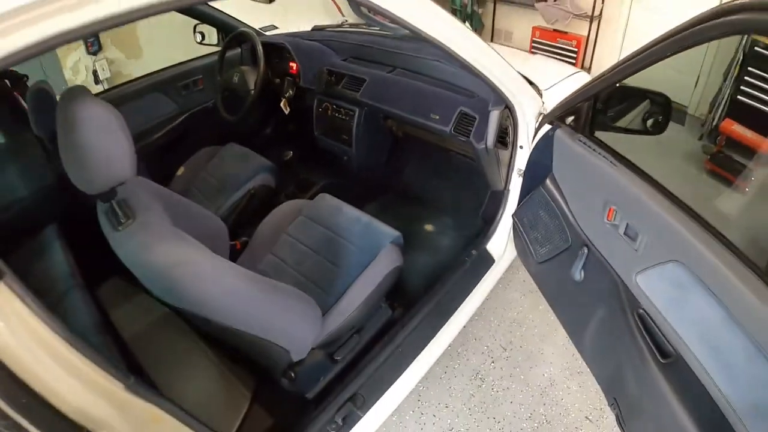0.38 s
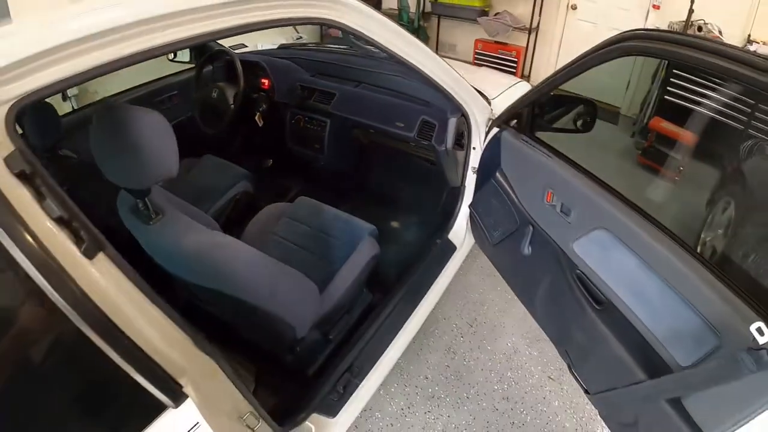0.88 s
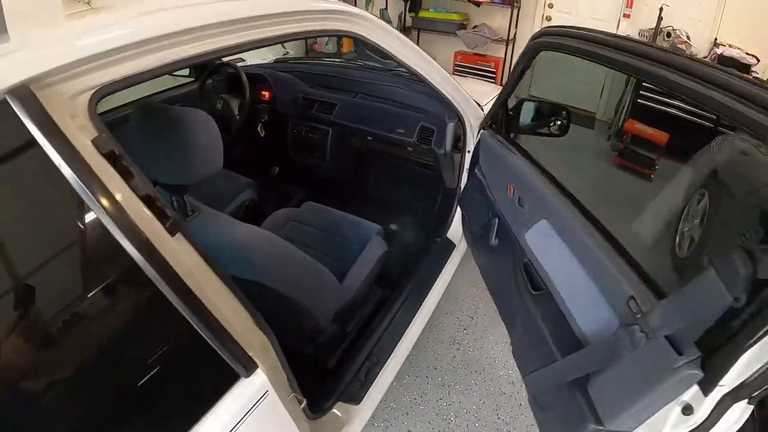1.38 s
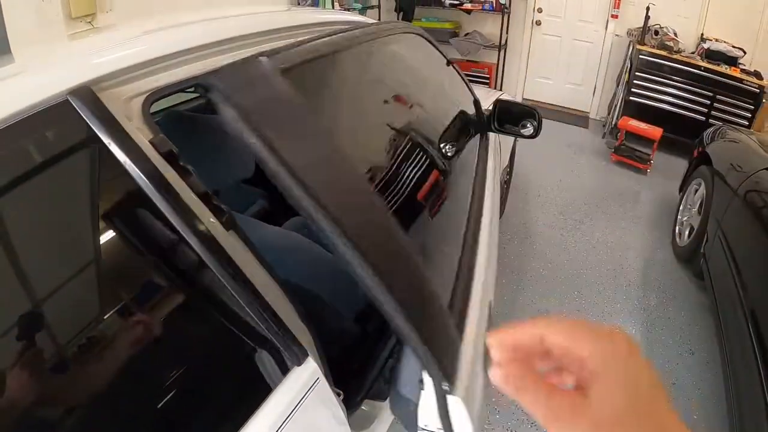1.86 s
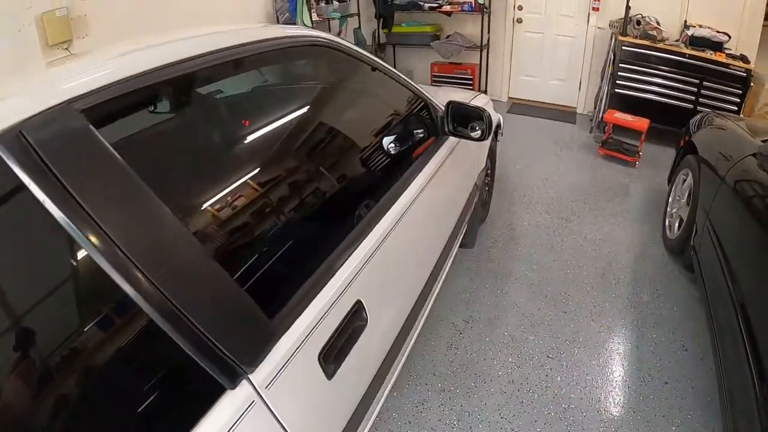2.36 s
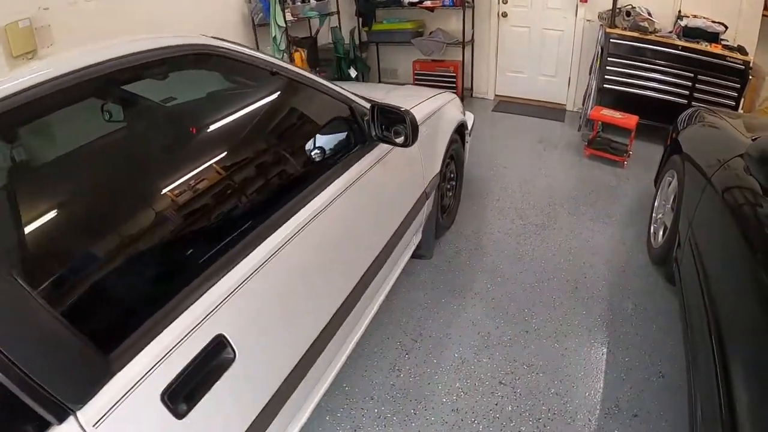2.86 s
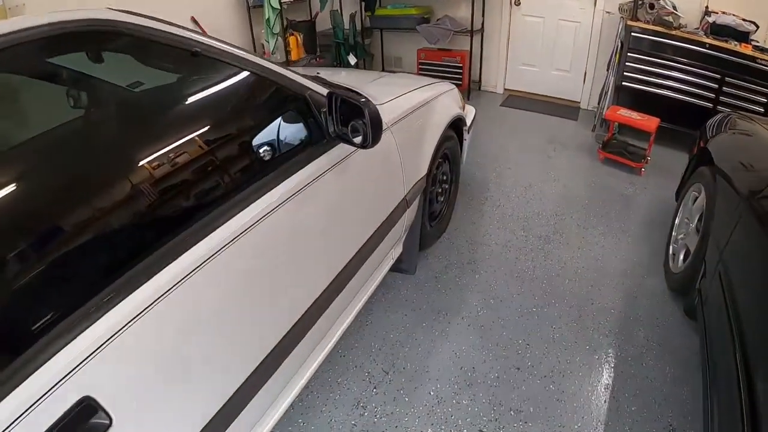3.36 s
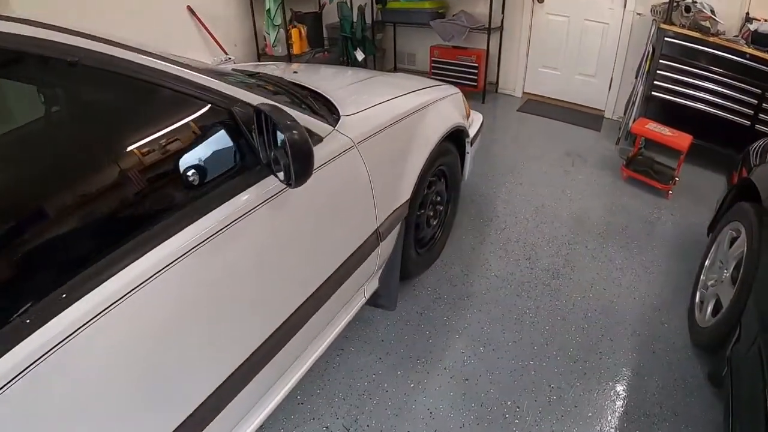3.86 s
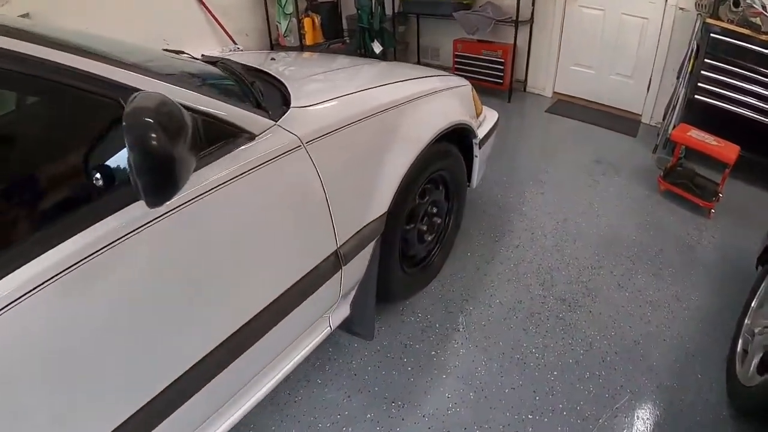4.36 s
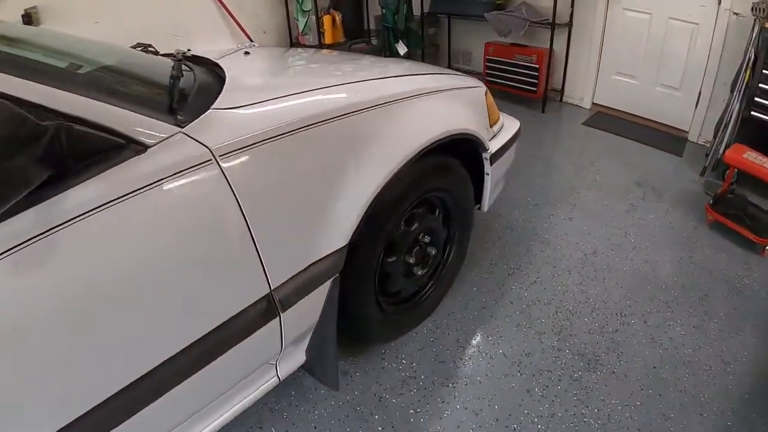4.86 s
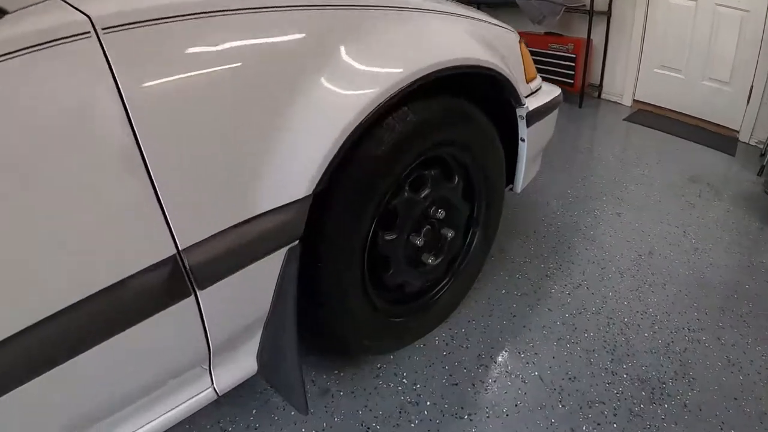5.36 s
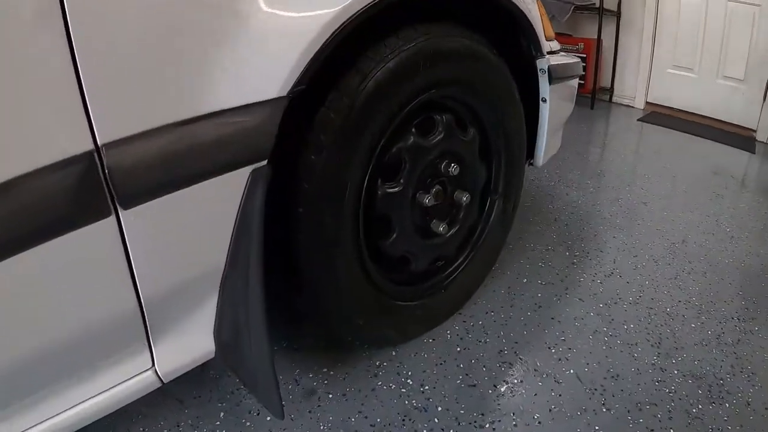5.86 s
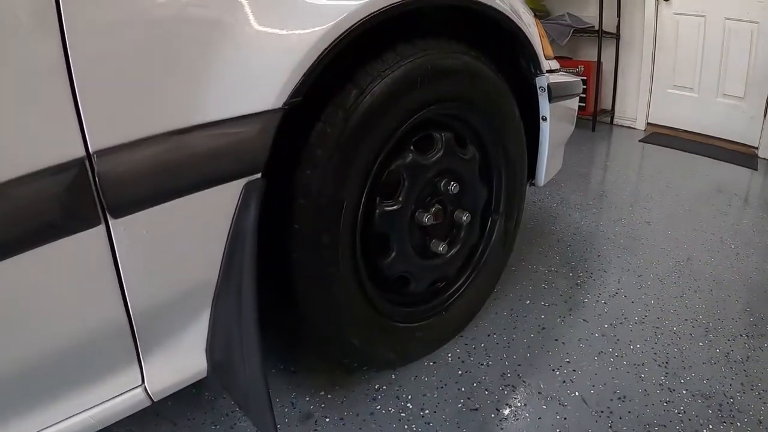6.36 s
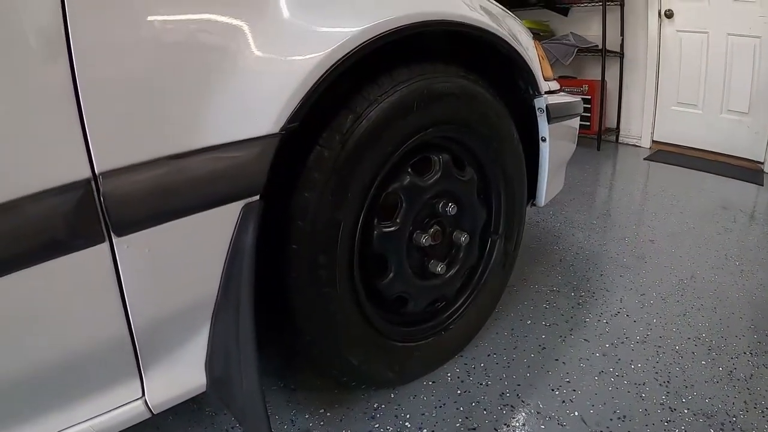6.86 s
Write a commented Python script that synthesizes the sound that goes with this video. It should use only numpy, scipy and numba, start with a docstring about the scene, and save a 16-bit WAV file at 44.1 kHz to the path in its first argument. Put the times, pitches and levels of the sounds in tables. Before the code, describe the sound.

Close handheld stereo sound beside an idling car indoors: deep wavering drone, fast dull pulses, breathy fan and belt hiss with faint whines. A very short rubbery squeak, later a cluster of metal clicks, then a heavy door slam with clattering glass and trim and a quick garage echo. Afterwards only the engine remains, momentarily subdued, becoming fuller and more throbbing as the listener walks to the front.

```python
"""Idling car in a closed garage, and a slammed door

A car idles: low crank-order tones and a dull knock under coloured hiss and thin whines, all shifting as the
listener comes nearer the engine bay. A sole squeaks by stick-slip, the door's check strap snaps, then after
a soft puff of air the slam drives the door's modes and shakes loose a dense rattle, in a decaying noise tail
of garage echo. Gain control ducks everything after the slam and creeps back."""
import sys
import numpy as np
from scipy import signal
from scipy.fft import rfft, irfft
from scipy.io import wavfile
from scipy.ndimage import uniform_filter1d
from numba import njit

SR = 44100
rng = np.random.default_rng(int(sys.argv[2]) if len(sys.argv) > 2 else 0)


def inscribe(sig):
    """Save sig as 16-bit PCM at rate SR to the path in sys.argv[1].

    A 1-D sig is mono; a 2-D sig holds one channel per row.
    Samples are clipped to [-1, 1] before scaling.
    """
    pcm = np.round(np.clip(np.atleast_2d(sig).T, -1, 1) * 32767)
    wavfile.write(sys.argv[1], SR, pcm.astype(np.int16))


def makeup_ratio(level_db):
    """Linear amplitude ratio for a level in decibels (20 dB per factor of ten)."""
    decades = np.asarray(level_db, float) / 20
    return 10 ** decades


N = 318843
T = np.arange(N) / SR
F = np.fft.rfftfreq(N, 1 / SR)
BANDS = 25 * 2 ** np.arange(0, 9.6, .5)  # half-octave centres, Hz

CRANK_HZ = 15.55
THROB_DB_PER_M = 11  # fall of the upper orders and of the knock
# stereo width of hiss and echo: (f/Hz, side minus mid/dB)
SIDE_COLOUR = [(60, -28), (200, -20), (380, -14), (700, -13), (1290, -10.5), (2380, -7), (4400, -6),
               (8120, -1.5), (15000, 3)]


def along(table, hz):
    """Read (f/Hz, value) points on a log-frequency axis."""
    f, v = np.transpose(table)
    return np.interp(np.log(hz + 1), np.log(f + 1), v)


def unit(x):
    """Scale to rms 1."""
    return x / np.sqrt(np.mean(x ** 2))


def walk(rate):
    """Smooth random drift of rms 1, with rate new values a second."""
    k = int(SR / rate)
    held = np.repeat(rng.standard_normal(N // k + 1), k)
    smooth = uniform_filter1d(uniform_filter1d(held, k), k)
    return unit(smooth[:N])


def slices(hz):
    """Overlapping half-octave windows that add up to one."""
    place = np.clip(2 * np.log2(np.maximum(hz, 1) / BANDS[0]), 0, len(BANDS) - 1)
    return [np.cos(np.pi / 2 * np.clip(place - k, -1, 1)) ** 2 for k in range(len(BANDS))]


def ring(x, hz, t60):
    """One decaying mode driven by x; t60 is at least 5 ms."""
    pole = np.exp(2j * np.pi * hz / SR - np.log(1000) / (max(t60, .005) * SR))
    return signal.lfilter([1], [1, -pole], x).imag


def crack(hz, decay_ms, low=0.7, high=1.136):
    """A few milliseconds of noise in a band from low to high times hz, peak 1."""
    t = np.arange(SR // 20) / SR
    burst = rng.standard_normal(len(t)) * np.exp(-t * 1000 / decay_ms)
    band = signal.butter(2, [low * hz, min(high * hz, SR / 2.2)], "band", fs=SR, output="sos")
    burst = signal.sosfilt(band, burst)
    return burst / np.abs(burst).max()


def add(out, s, x):
    """Mix x into out from time s."""
    k = int(s * SR)
    out[k:k + len(x)] += x


def stereo(mid, side):
    """Mid and side to left and right."""
    return np.array([mid + side, mid - side])


def distance():
    """Metres from the listener to the engine bay."""
    # the walk: nearer the engine bay, slowly until the slam, then faster, with one short step back:
    # (t/s, distance/m)
    steps = [(0, 2.77), (.3, 2.5), (1.0, 2.48), (1.7, 2.43), (2.5, 2.36), (3.3, 1.78), (4.2, 1.88),
             (5.0, 1.51), (5.6, 1.32), (6.3, 0.98), (7.23, 1)]
    return np.interp(T, *np.transpose(steps))


def hiss_db():
    """Level of the engine's hiss along the walk: -32.5 dB at 1 m, falling 3.5 dB per m."""
    return -32.5 - 3.5 * (distance() - 1)


def hum(turns):
    """Crank orders as wavering tones; low ones pass through nodes along the walk, upper ones fade with distance."""
    # pitch of each order: (multiple of the crank speed)
    orders = [2, 4, 6, 8, 8.7, 16, 24, 27, 29, 36]
    # level of each order at 1 m, ahead of its standing wave: (level/dB)
    order_db = [-32.5, -27, -42, -48.5, -46.5, -49.5, -52, -48.5, -50.5, -48]
    # the five lowest orders stand between the walls:
    # (distance of a node/m, level left at the node/dB, fall/dB per m)
    standing = [(5.14, -22, -0.15), (2.67, -17, 6.5), (1.47, -16, 0.7), (1.39, -5.5, -5),
                (1.255, -19.5, -7)]
    # the open cabin booms once per firing, against the room's phase, until the door shuts: (t/s, level/dB)
    cabin = [(0, -28), (.25, -25.5), (.62, -22), (1.2, -28.5), (1.7, -32.5), (2.19, -32)]
    r, out = distance(), 0
    for k, (order, db) in enumerate(zip(orders, order_db)):
        if k < len(standing):
            node_m, node_db, db_per_m = standing[k]
            wave = np.sin(2 * np.pi * (node_m - r) * order * CRANK_HZ / 343)
            reach = wave + 1j * makeup_ratio(node_db)  # the node never falls quite silent
        else:
            reach, db_per_m = 1, THROB_DB_PER_M
        size = reach * makeup_ratio(db - db_per_m * (r - 1))
        if k == 0:
            size = size - makeup_ratio(np.interp(T, *np.transpose(cabin))) * (T < cabin[-1][0])
        # higher orders reach the ear by many paths and waver more
        waver = min(order / 16, 1)
        drift = waver * (0.37 * walk(2.945) + .5 * walk(14))
        phase = 2 * np.pi * (order * turns + rng.random()) + drift
        swell = makeup_ratio((1.3 + 1.22 * waver) * walk(4))
        out = out + np.sqrt(2) * swell * (size * np.exp(1j * phase)).imag
    return stereo(out, 0)


def knock(turns):
    """The block takes a dull knock once per crank turn, never quite the same, and rings briefly."""
    level_db, hz, t60_s = -36.5, 288, 0.12  # rms level at 1 m
    scatter_db, scatter_s = 2.5, 0.00067  # standard deviations of strength and timing
    at = np.flatnonzero(np.diff(np.floor(turns)))
    chance = rng.standard_normal((len(at), 2))
    late = (scatter_s * SR * chance[:, 0]).astype(int)
    push = np.zeros(N)
    push[np.clip(at + late, 0, N - 1)] = makeup_ratio(scatter_db * chance[:, 1])
    # two modes in a row soften the onset
    rung = unit(ring(ring(push, hz, t60_s), hz, t60_s / 2))
    return rung * makeup_ratio(level_db - THROB_DB_PER_M * (distance() - 1))


def rush(turns):
    """Fan, belts and valves: coloured noise in bands that flicker alone, pulsing a little with each crank turn."""
    # broad colour of the hiss, relative: (f/Hz, level/dB per Hz)
    colour = [(12, -38), (20, -5.5), (50, -7.5), (133, -19), (190, -18), (297, -16.5), (351, -19),
              (564, -16.5), (856, -21), (1370, -17), (4300, -27), (5670, -38.5), (9110, -48), (13100, -65),
              (15400, -74)]
    # resonances of engine bay and belts: (f/Hz, width/Hz, level over the rush/dB)
    bay = [(758, 61, -5), (1005.5, 9, 7.5), (1200, 12, 5.5), (1353, 28, 7.5), (1493, 66, 4.5),
           (1720, 140, 2), (2237, 4.7, 13.5), (2428, 7.8, 13.5), (3068, 63, 6.5), (9370, 44, 10)]
    body_db_per_m, treble_db_per_m = 2, -0.8  # tilt with distance below 600 Hz and above 7 kHz
    beyond = distance() - distance().mean()
    colour_db = along(colour, F) + sum(db / (1 + (2 * (F - hz) / w) ** 2) for hz, w, db in bay)
    mid, side = rfft(rng.standard_normal((2, N))) * makeup_ratio(colour_db)
    side = side * makeup_ratio(along(SIDE_COLOUR, F))
    # the hiss level refers to the mid between 1 and 5 kHz
    scale = np.sqrt(np.mean(irfft(mid * ((F > 1000) & (F < 5000)), N) ** 2))
    pulse = np.cos(2 * np.pi * turns)
    edges = np.log([600, 1000, 5000, 7000])
    out = 0
    for hz, window in zip(BANDS, slices(F)):
        tilt = np.interp(np.log(hz), edges, [body_db_per_m, 0, 0, treble_db_per_m])
        flicker_db = 0.51 * walk(1.85) + 0.66 * walk(9)
        db = hiss_db() + tilt * beyond + flicker_db + 0.14 * pulse
        out = out + makeup_ratio(db) * stereo(*irfft(np.array([mid, side]) * window, N))
    return out / scale


def whines():
    """Narrow tones of gears, belt and alternator, whose level and stereo phase drift at random."""
    # the thin tones: (f/Hz, peak over the hiss level/dB)
    tones = [(1028, -20.5), (1373, -13), (1495, -11.5), (1690, -25), (2239, -20), (2433, -19), (3020, -19),
             (9442, -40)]
    out = 0
    for hz, db in tones:
        phase = 2 * np.pi * hz * T + 2.8 * walk(25)
        swell = makeup_ratio(db + 2.4 * walk(2.96))
        out = out + swell * np.array([np.sin(phase), np.sin(phase + 0.73 * walk(2.86))])
    return out * makeup_ratio(hiss_db())


def squeak():
    """Stick-slip of rubber: each slip is a buzzy climbing tone whose partials swell as they cross a resonance."""
    # a sole squeaks on the coated floor in two slips:
    # (t/s, length/s, slip rate/Hz, climb/Hz per s, level/dB)
    slips = [(0.355, .017, 950, 2200, -25), (.367, 0.0355, 761, 4240, -29)]
    # rubber resonances: (f/Hz, width/Hz, level/dB)
    sole = [(940, 270, -2.5), (1640, 220, 1.5), (3080, 300, -3.5), (4920, 180, -23)]
    attack_s, release_s = 0.0032, 0.0046
    out = 0
    for s, length, start_hz, climb, db in slips:
        hz = start_hz + climb * np.clip(T - s, 0, length)
        phase = 2 * np.pi * np.cumsum(hz * (1 + 0.016 * walk(300))) / SR
        shape = np.clip(np.minimum((T - s) / attack_s, (s + length - T) / release_s), 0, 1)
        for k in range(1, 7):
            gain = sum(makeup_ratio(peak_db) / (1 + (2 * (k * hz - f) / w) ** 2) for f, w, peak_db in sole)
            out = out + np.sqrt(2) * makeup_ratio(db) * shape * gain * np.sin(k * phase)
    return out


def snaps():
    """Short metallic ticks: an impulse rings one mode under a bright noise edge."""
    # the door check strap snaps as the door starts to swing:
    # (t/s, ring level/dB, ring f/Hz, ring t60/s, crack level/dB)
    ticks = [(1.543, -17, 1510, .014, -25.5), (1.549, -20, 1520, 0.026, -29),
             (1.555, -29, 1365, 0.074, -48)]
    out = np.zeros(N)
    for s, db, hz, t60, crack_db in ticks:
        impulse = np.r_[1., np.zeros(SR // 4)]
        add(out, s, makeup_ratio(db) * ring(impulse, hz, t60))
        add(out, s, makeup_ratio(crack_db) * crack(2800, 2.6, low=.06, high=2.0))
    return out


def slam():
    """Each blow pushes the door's modes and springs back, softer ones for longer, and throws a crack."""
    # a soft puff of air, then contacts as the door meets latch, seals and frame:
    # (t/s, relative blow level/dB, push length/ms, crack peak level/dB, crack f/Hz)
    blows = [(2.165, -24, 14.5, -60, 600), (2.1916, -16, 0.68, -7.5, 2700), (2.1944, -8, 1.86, -26, 3000),
             (2.1991, -2.5, 3.7, -19, 900), (2.211, 1, 21.1, -33, 4500), (2.2114, -8.5, 2.75, -9, 2580),
             (2.214, -2.5, 6.2, -9, 1200), (2.221, -21, 3.05, -34, 6000), (2.236, 2, 21, -26, 1200),
             (2.2435, -4, 0.67, -14.5, 6360), (2.251, -25, 8.1, -21, 1000), (2.263, -1, 7.7, -22, 1400),
             (2.2756, -12, 2, -18, 5100), (2.296, -15.5, 2, -28, 1300), (2.309, 3.5, 26.4, -19, 2700),
             (2.311, -5.5, 4.47, -34, 900), (2.33, -5.5, 8.1, -51, 900), (2.346, -16, 12, -51, 905)]
    # modes of door and cabin: (f/Hz, relative level/dB, t60/s)
    door = [(30, -7, 0.23), (52.4, 0, 0.35), (80.4, 0, 0.2), (119, -1, 0.22), (169, 0.5, 0.2),
            (134.4, 2, 0.14), (212.7, 4, 0.15), (250, 2, 0.069), (281, 1, 0.11), (390, 0, 0.06),
            (435, 2, 0.087), (580, -3, 0.033), (626, 3, 0.13), (724, 6, 0.05), (830, -9, 0.19),
            (976, -3, 0.06), (1200, 6, 0.1), (1620, -7, 0.072), (1890, -1, 0.057), (2083, -11, 0.039),
            (2370, 2, 0.038), (2756, -33, .05), (3000, -28, .04), (5100, -32, .05), (6158, -22, .04)]
    push, cracks = np.zeros(N), np.zeros(N)
    for s, db, ms, crack_db, hz in blows:
        count = int(ms * SR / 1000) + 2
        swing = np.sin(2 * np.pi * np.arange(count) / count)
        add(push, s, makeup_ratio(db) * swing * np.hanning(count) / count)
        add(cracks, s, makeup_ratio(crack_db) * crack(hz, 3.5))
    return cracks + 0.89 * sum(makeup_ratio(db) * ring(push, hz, t60) for hz, db, t60 in door)


def rattle():
    """Glass, trim and lock rods shake loose at the latch: dense unequal knocks that die away ever faster."""
    # colour given by the panels, relative: (f/Hz, level/dB per Hz)
    colour = [(120, -30), (250, 4), (700, -2.5), (1300, -4.5), (2600, -14), (4000, -24.5), (6200, -34),
              (9000, -39.5), (15000, -54)]
    start_s, level_db = 2.192, -18
    hold_s, fade_s = .07, .23  # fade: time to lose 60 dB after the hold
    treble_db, treble_rise_s = 3.5, 0.039
    knocks = rng.standard_normal(N) * makeup_ratio(2.5 * walk(300))
    shaped = rfft(knocks) * makeup_ratio(along(colour, F))
    low, high = irfft(shaped * np.array([F < 4000, F >= 4000]), N)
    since = np.maximum(T - start_s, 0)
    fade_db = 60 * (np.maximum(since - hold_s, 0) / fade_s) ** 2
    gate = makeup_ratio(level_db - fade_db) * (since > 0)
    # the small bright parts start at a third and join fully a moment later
    bright = makeup_ratio(treble_db) * np.minimum(0.33 + since / treble_rise_s, 1)
    # the level refers to the part below 4 kHz
    return gate * (low + bright * high) / np.sqrt(np.mean(low ** 2))


def garage(x, wet_db):
    """Hard walls: a noise tail with its own decay in each band, short in the high treble, wider with pitch."""
    # decay of the room: (f/Hz, t60/s)
    decay = [(30, 0.99), (200, 0.38), (1000, 0.32), (4000, 0.34), (12000, 0.17)]
    # thin walls let the bass out: (f/Hz, level/dB)
    bass = [(30, -11), (120, -1), (300, -1.5), (15000, -3)]
    t = T[:SR]
    hz = np.fft.rfftfreq(SR, 1 / SR)
    mid, side = rfft(rng.standard_normal((2, SR)))
    both = np.array([mid, side * makeup_ratio(along(SIDE_COLOUR, hz))]) * makeup_ratio(along(bass, hz))
    tail = 0
    for f, window in zip(BANDS, slices(hz)):
        tail = tail + irfft(both * window, SR) * np.exp(-np.log(1000) * t / along(decay, f))
    energy = np.sum(tail[0] ** 2)
    # echoes build up over 20 ms
    tail = tail * np.clip(t / 0.02, 0, 1) / np.sqrt(energy)
    wet = signal.fftconvolve(x[None], makeup_ratio(wet_db) * tail, axes=1)[:, :N]
    return stereo(x + wet[0], wet[1])


def scene():
    """Idling engine with a slightly unsteady crank, and the close events in the room."""
    turns = np.cumsum(CRANK_HZ * (1 + 0.00384 * walk(1.5))) / SR
    engine = hum(turns) + knock(turns) + rush(turns) + whines()
    small = garage(squeak() + snaps(), wet_db=-12.0)
    door = garage(slam() + rattle(), wet_db=-3.5)
    return engine + small + door


@njit
def follow(x, attack, release):
    """Envelope that rises fast and sinks slowly."""
    env, e = np.empty(len(x)), 0.
    for i in range(len(x)):
        e += (x[i] - e) * (attack if x[i] > e else release)
        env[i] = e
    return env


def roll_off(x):
    """The treble ends steeply here."""
    return signal.sosfilt(signal.butter(12, 15600, fs=SR, output="sos"), x)


def record(dry):
    """Gain control ducks after the slam and creeps back; peaks are rounded; the two ports differ in colour."""
    # colour of the two microphone ports: (f/Hz, left minus right/dB)
    port_colour = [(60, 0), (1290, .2), (2380, 1.5), (4400, .5), (8120, -3.2), (15000, -1)]
    port_lag_s, pad = 3e-5, SR // 10
    # 54 ms attack, 0.7 s release, threshold -24 dB
    env = follow(np.abs(dry).max(axis=0), 1 / (0.054 * SR), 1 / (.7 * SR))
    ducked = dry * np.minimum(makeup_ratio(-24.0) / (env + 1e-9), 1) ** .45
    rounded = np.tanh(1.05 * ducked) / 1.145
    rounded = np.pad(rounded, ((0, 0), (pad, pad)), "reflect")
    hz = np.fft.rfftfreq(rounded.shape[1], 1 / SR)
    ports = makeup_ratio(along(port_colour, hz) / 2 * np.array([[1], [-1]])) + 0j
    # sound reaches the left port a moment later
    ports[0] *= np.exp(-2j * np.pi * hz * port_lag_s)
    mix = irfft(rfft(rounded) * ports, rounded.shape[1])[:, pad:pad + N]
    return roll_off(mix)


dry = scene()
out = record(dry)
inscribe(out)
```